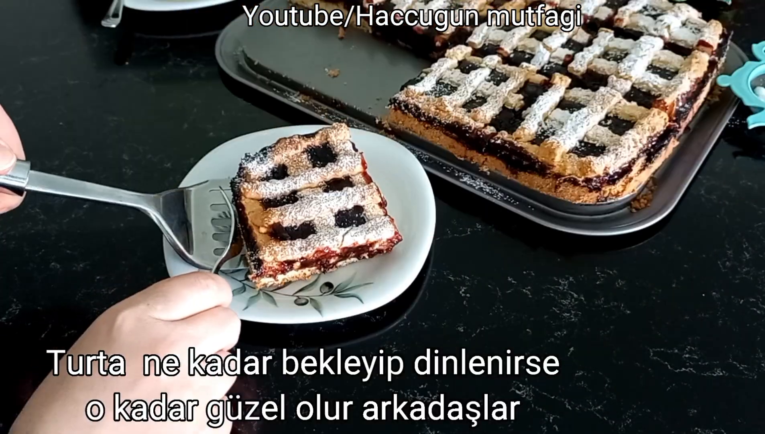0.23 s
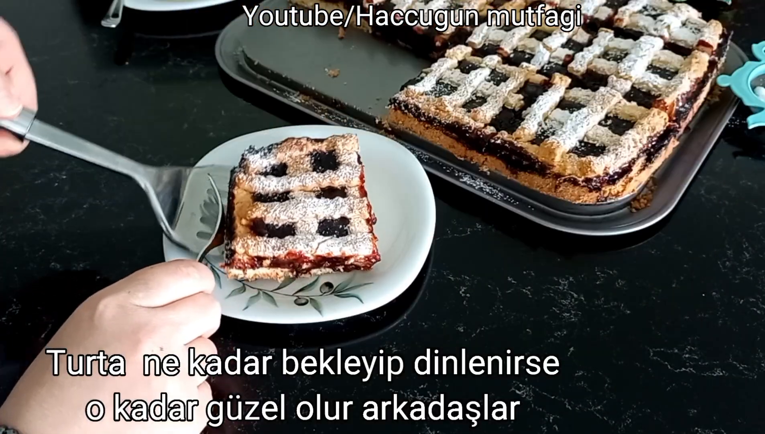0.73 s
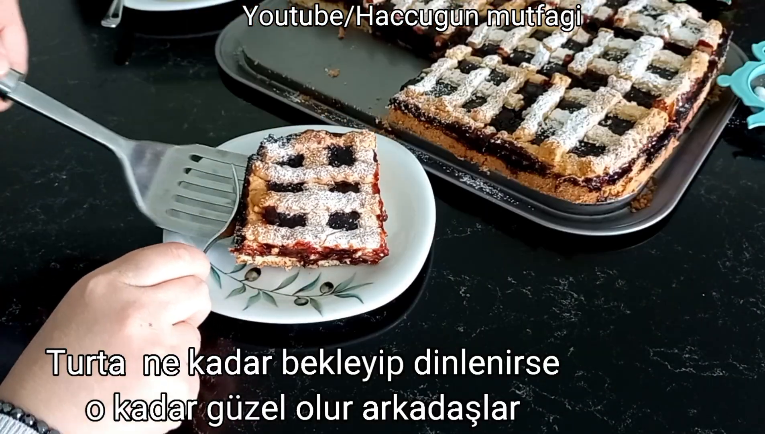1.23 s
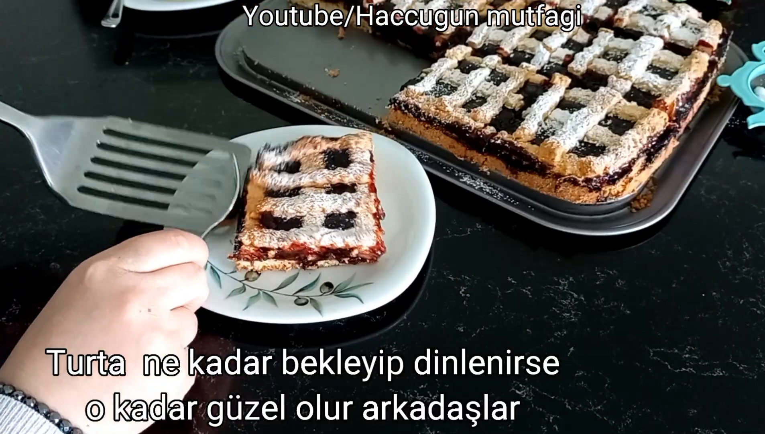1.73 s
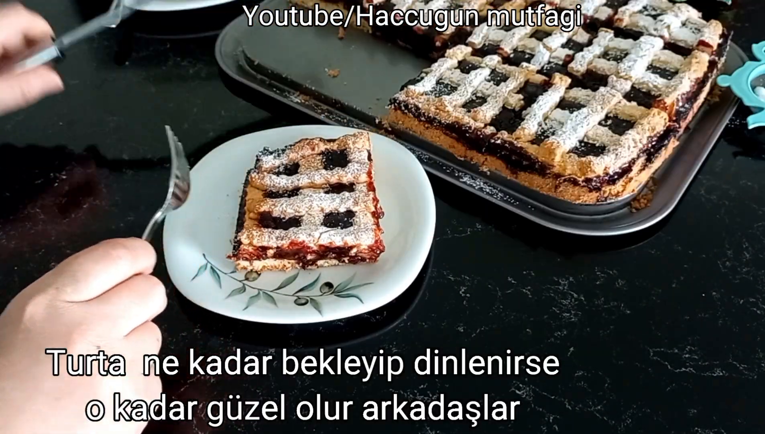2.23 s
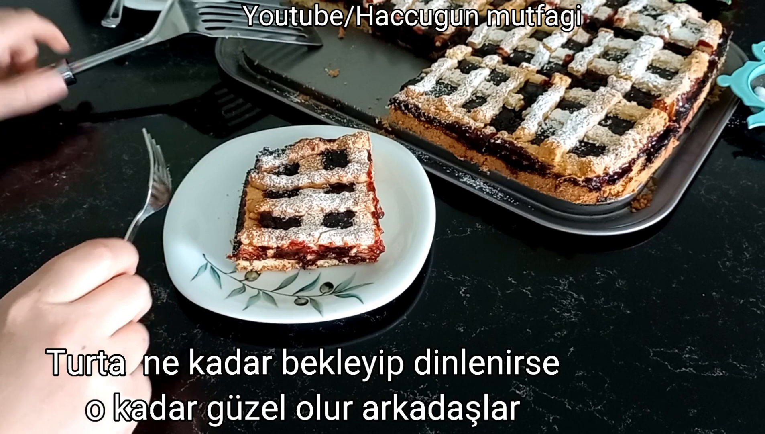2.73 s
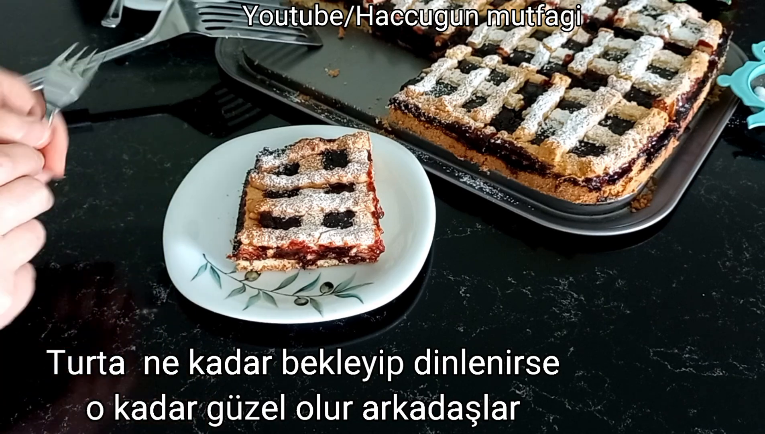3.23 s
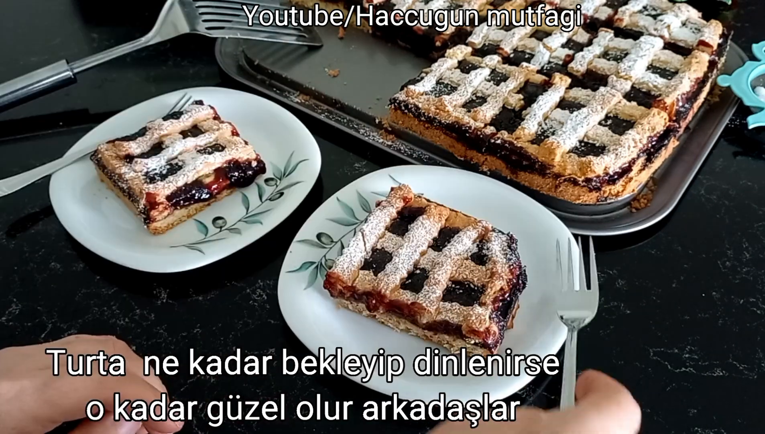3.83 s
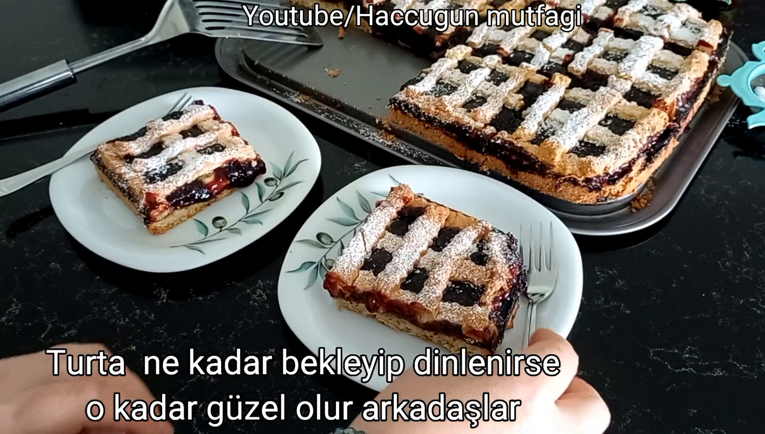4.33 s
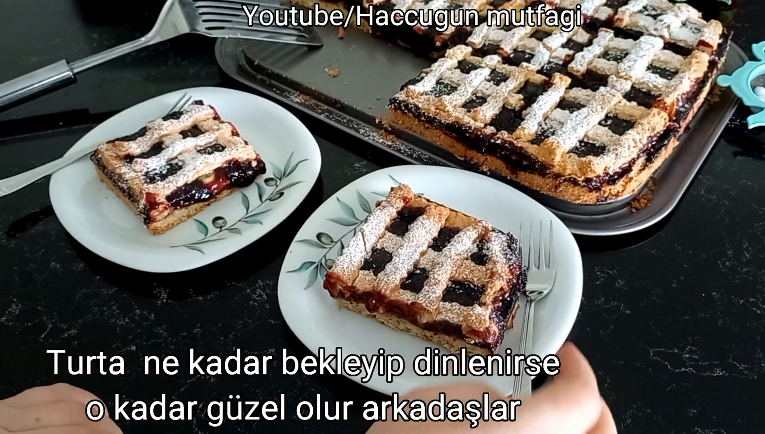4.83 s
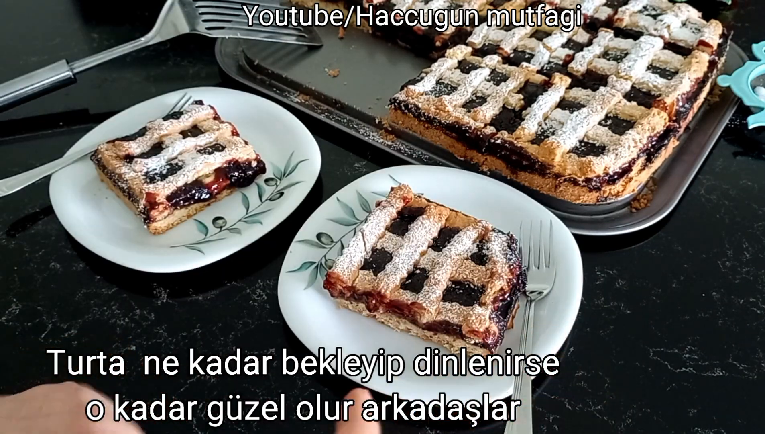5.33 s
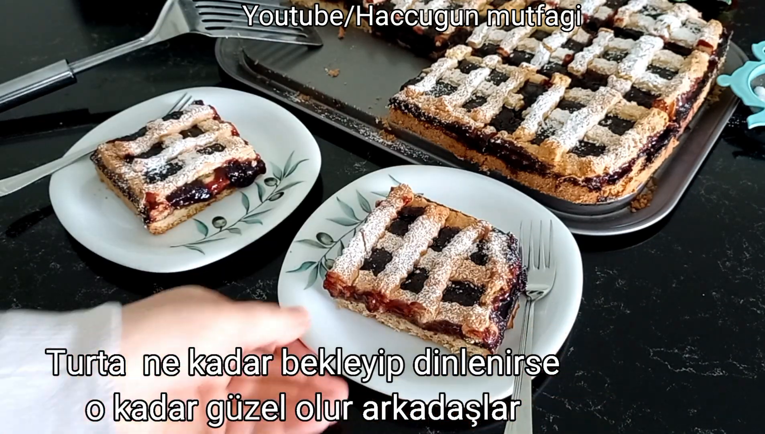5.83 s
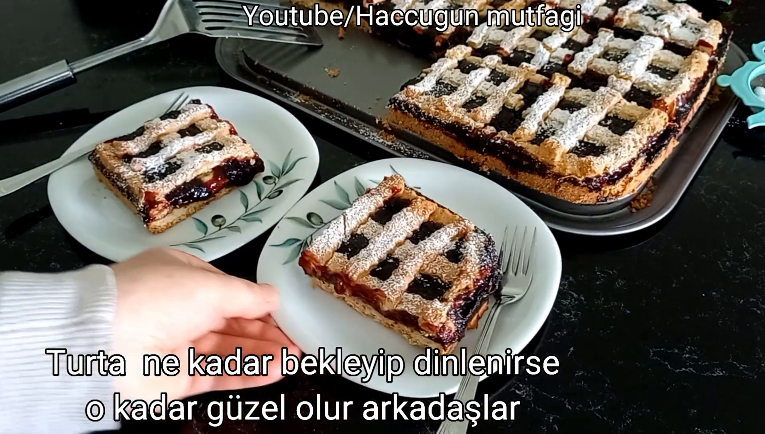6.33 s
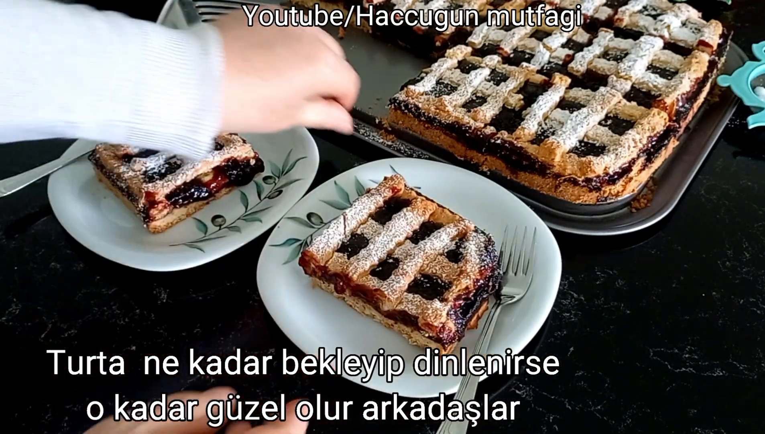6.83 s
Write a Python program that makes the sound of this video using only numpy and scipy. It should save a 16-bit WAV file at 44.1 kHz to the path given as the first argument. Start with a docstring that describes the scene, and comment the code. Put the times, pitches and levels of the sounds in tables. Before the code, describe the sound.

A quiet kitchen, heard close in stereo with a short, diffuse room tail. A dull, nearly mono air rush and very faint hiss run throughout. A far bird gives thin, sometimes hoarse whistles, clearest at about 1.2, 4.3 and 6.6 s. Around 1.4 to 2.1 s a steel spatula makes barely audible high swishes, with a faint double tick on china at 1.88. At 2.54 to 2.6 it settles on the loaded tray, a soft tinny clatter with a slight low thud. At 2.86 water starts suddenly in the centre, a thin trickle of hollow gurgles, pinging drops and uneven spray. A fork clinks loud and bright on china at 4.1, tapping lightly at 4.46. The water stops near 5.63, creeps back from 5.8 and grows splashier. At 6.42 plates knock in a rapid, bright, wide triple contact; the trickle continues to the end, about 7.1 s.

```python
"""A far bird whistles faintly, now and then, over room tone; its calls are frequency-modulated sine tones.
Cake is served at a kitchen counter: a steel spatula swishes (shaped noise), ticks on a plate (decaying modes)
and is laid on the baking tray (noise clatter and a low sine thud). Water then trickles dead centre in two runs
of ringing bubbles, pinging drops and resonant spray. During the first a fork is set down on china; during the
second one plate knocks against another. A decaying diffuse tail answers the china and the tray."""
import sys
import numpy as np
from scipy import signal
from scipy.fft import rfft, irfft, next_fast_len
from scipy.io import wavfile
from scipy.ndimage import map_coordinates

SR = 44100
rng = np.random.default_rng(int(sys.argv[2]) if len(sys.argv) > 2 else 0)


def master_out(mix):
    """Clip the mix to full scale and print it as 16-bit PCM to the path in sys.argv[1]."""
    frames = np.transpose(np.atleast_2d(mix))
    ceiling = np.clip(frames, -1, 1)
    pcm = np.round(ceiling * 32767).astype(np.int16)
    wavfile.write(sys.argv[1], SR, pcm)


N = 312669
TIME = np.arange(N) / SR  # s

# reverberation of the kitchen: f/Hz, t60/s
KITCHEN_DECAY = [(150, 0.58), (1000, 0.47), (2500, 0.43), (6000, 0.37), (10000, 0.38), (15000, 0.34)]
# the two runs of water: start t/s, rise time/s, stop t/s, t60 of the last dribble/s
WATER_RUNS = [(2.86, 0.0031, 5.625, 0.069), (5.79, 0.017, 7.1, .06)]


def amp(db):
    """Decibels to an amplitude ratio: 20 dB is a factor of ten."""
    return 10 ** (np.asarray(db) / 20)


def unit(x):
    """Normalisation to an rms of 1."""
    return x / np.sqrt(np.mean(x ** 2) + 1e-20)


def along(points, hz):
    """Interpolation of (f/Hz, value) points on a logarithmic frequency axis."""
    f, value = np.transpose(points)
    return np.interp(np.log(hz + 1), np.log(f + 1), value)


def curves(rows):
    """Linear interpolation in time: one value per sample for each column after the time."""
    seconds, *columns = np.transpose(rows)
    return [np.interp(TIME, seconds, column) for column in columns]


def wobble(rate):
    """Smooth random modulation: a spline through random knots, rate knots a second."""
    return map_coordinates(rng.standard_normal(8192), [TIME * rate], mode="wrap")


def filtered(x, response):
    """Linear filtering: the spectrum is multiplied by a gain that depends on frequency."""
    n = x.shape[-1]
    padded = next_fast_len(n + 8192)
    spectrum = rfft(x, padded) * response(np.fft.rfftfreq(padded, 1 / SR))
    return irfft(spectrum, padded)[..., :n]


def noise(spectrum, shape):
    """Coloured noise of rms 1: white noise shaped by (f/Hz, level/dB) points."""
    white = rng.standard_normal(shape)
    return unit(filtered(white, lambda hz: amp(along(spectrum, hz))))


def fade(t, t60):
    """Exponential decay by 60 dB in t60."""
    return np.exp(-np.log(1000) * t / t60)


def swell(u):
    """Smooth growth and decay: the envelope grows to 1 at u = 1, then dies away."""
    return u ** 2 * np.exp(2 - 2 * u)


def add(track, s, x):
    """Superposition: mixes x into the track at time s."""
    part = track[..., max(round(s * SR), 0):][..., :x.shape[-1]]
    part += x[..., :part.shape[-1]]


def diffuse(pair):
    """Spatial coherence: two unrelated signals become a stereo field, narrower in the bass."""
    # f/Hz, side level/dB
    side_levels = [(80, -3), (400, -10), (1200, 0.5), (2500, -2.5), (8000, -0.5)]
    mid = pair[0]
    side = filtered(pair[1], lambda hz: amp(along(side_levels, hz)))
    return np.array([mid + side, mid - side]) / np.sqrt(2)


def echo(x, decays):
    """Reverberation: convolution with diffuse noise of unit energy whose bands decay at their own speed."""
    hz, t, z = signal.stft(rng.standard_normal((2, SR)), SR, nperseg=256)
    decaying = z * fade(t, along(decays, hz)[:, None])
    tail = diffuse(signal.istft(decaying, SR, nperseg=256)[1])
    delayed = np.pad(tail, ((0, 0), (130, 0)))  # about 3 ms before the tail begins
    return signal.fftconvolve(np.atleast_2d(x), delayed / np.linalg.norm(tail[0]), axes=1)[:, :N]


def china(crack_db=-7, crack_t60=0.013, shiver=0.44, attack=0.00015):
    """Modal synthesis: each blow rings damped plate modes, blurred by phase drift, with a crack of contact."""
    # blows: t/s, level/dB, brightness/(dB per octave), left minus right/dB, room over the blow/dB,
    # ring colour (0 = struck as by the fork to 1 = struck at the rim)
    blows = [(1.875, -48.5, 2, 7, -8, 0.56), (1.886, -43.5, 0.5, 1, -6.5, 1),
             (4.101, -16, 1.5, 2.5, -9.5, 0), (4.105, -23, 0, 3, 3, 0.61), (4.458, -36, 0, 16.5, -2, 0.26),
             (4.466, -29.5, 1, 6, -3.5, 0.068), (6.4226, -17, -2, 14, 6, 0.96),
             (6.425, -14.5, -0.5, -11, -14, 0.85), (6.431, -19, 3.5, 16.5, -17, 0.84)]
    # plate modes: f/Hz, relative level at ring colour 0/dB, relative level at ring colour 1/dB, t60/s
    plate_modes = [(615, -21, -17, .06), (850, -15, -13, .04), (1200, -18, -14, .06), (1450, -18, -10, .04),
                   (1675, -15, -10, .05), (1875, -11, -8, .05), (2160, -16, -9, .05), (2480, -9, -2, .04),
                   (2570, -3, 0, .05), (2720, -2, -10, .04), (2990, -4, -11, .04), (4110, -4, -1, .04),
                   (4230, -6, -8, .05), (4650, -13, -20, .03), (5965, 1, -11, .04), (7050, -11, -17, .05),
                   (7990, -10, -16, .06), (8500, -15, -26, .05), (9550, -22, -25, .06),
                   (10350, -15, -16, .07), (11600, -21, -20, .05), (12750, -16, -21, .045),
                   (14100, -28, -11, .08), (14800, -18, -28, .06)]
    # contact noise: f/Hz, relative level/dB
    contact_spectrum = [(60, -32), (250, -29), (700, -5), (2500, 0), (3500, 3.5), (5000, -1.5), (8000, 0),
                        (15000, -32.5)]
    # f/Hz, phase between left and right microphone/rad
    mic_phases = [(500, 0), (2500, .3), (4100, 2.7), (7000, 2.7), (11000, 1.5)]
    out, t = np.zeros((2, N)), np.arange(SR // 4) / SR
    hz, fork_db, rim_db, t60 = np.transpose(plate_modes)
    mics = np.multiply.outer([-.5, .5], along(mic_phases, hz))[:, :, None]
    for s, db, bright_db, pan_db, room_db, ring_colour in blows:
        struck_db = fork_db + ring_colour * (rim_db - fork_db)
        tilt_db = bright_db * np.log2(hz / 4000)
        sizes = amp(struck_db + tilt_db + rng.standard_normal(len(hz)))
        steps = rng.standard_normal((len(hz), len(t)))
        drift = shiver * np.cumsum(steps, 1) / np.sqrt(SR / 1000)  # shiver in radians per root ms
        phase = rng.uniform(0, 2 * np.pi, (len(hz), 1)) + drift + mics
        partials = fade(t, t60[:, None]) * np.sin(2 * np.pi * hz[:, None] * t + phase)
        ring = np.sum(sizes[:, None] * partials, 1) / np.linalg.norm(sizes)
        crack_spectrum = [(f, level + bright_db * np.log2(f / 4000)) for f, level in contact_spectrum]
        crack = amp(crack_db) * diffuse(noise(crack_spectrum, (2, len(t)))) * fade(t, crack_t60)
        blow = amp(db) * (ring + crack) / np.sqrt(2) * (1 - np.exp(-t / attack))
        add(out, s, blow * amp([[pan_db / 2], [-pan_db / 2]]))
        add(out, s, amp(room_db) * echo(blow[0], KITCHEN_DECAY))
    return out


def tray(thud_hz=130, thud_t60=0.36, room_db=-8):
    """Damped vibration: the loaded tin tray clatters as decaying noise and thuds as a decaying sine."""
    # landing and settling: t/s, clatter level/dB, clatter t60/s, thud level/dB
    landings = [(2.536, -42, 0.28, -53), (2.549, -42.5, 0.23, -66), (2.577, -50, 0.16, -51.5),
                (2.603, -41.5, 0.058, -65), (2.61, -57, 0.09, -56)]
    # clatter: f/Hz, relative level/dB
    tin_spectrum = [(60, -27), (130, -36), (250, -1.5), (450, -7), (800, -1), (1500, -5.5), (2000, -3),
                    (2600, -3.5), (3300, -8), (4300, -16.5), (6000, -25.5), (9000, -23.5), (15500, -41)]
    out, t = np.zeros((2, N)), np.arange(SR // 2) / SR
    for s, clatter_db, t60, thud_db in landings:
        clatter = diffuse(noise(tin_spectrum, (2, len(t)))) * fade(t, t60)
        thud = np.sin(2 * np.pi * thud_hz * t) * fade(t, thud_t60)
        add(out, s, amp(clatter_db) * clatter)
        add(out, s, amp(thud_db) * thud)
    return out + amp(room_db) * echo(out[0], KITCHEN_DECAY)


def spatula():
    """Friction noise: steel brushes over crumbs with a faint, high swish in bell-shaped strokes."""
    # strokes under the cake: middle t/s, half length to 1/e/s, level/dB
    slides = [(1.434, 0.1, -75), (1.7, 0.3, -84.5), (2.1, 0.18, -78)]
    strokes = sum(amp(db) * np.exp(-((TIME - s) / half) ** 2) for s, half, db in slides)
    return strokes * noise([(2000, -19), (4000, -6.5), (8000, 4), (15000, 2.0)], (2, N))


def water(gurgle_db=0.5, splash_db=-2.0, murmur=1.0, fizz=1.52, spurt_db=2.47, glug_db=2.5):
    """Bubble acoustics: big bubbles gurgle low; fine spray fizzes through the resonances of a hollow."""
    # gurgle: f/Hz, gain/dB
    gurgle_spectrum = [(200, -41), (450, -13), (700, -8), (1000, 0), (1300, 1), (1700, -8.5), (2000, -3),
                       (2500, -15), (3300, -13.5)]
    # hollow resonances: f/Hz before tuning, width/Hz before the factor 0.56 below and tuning, level/dB
    resonances = [(2380, 2600, -9.5), (3180, 140, 6), (3680, 620, 1), (5200, 830, -2), (7175, 990, 1.5),
                  (9020, 1040, -14.5), (10200, 810, -19)]
    low = swarm(count=1800, low_hz=448.4, high_hz=2702, cycles=4.8, spread_db=3.5, size=1600)
    low = low + murmur * noise([(300, 2), (3000, -0.5), (4000, -25)], N)
    shaped = filtered(low, lambda hz: amp(along(gurgle_spectrum, hz)))
    gurgle = unit(shaped * amp(glug_db * wobble(55)))

    spray = swarm(count=11000, low_hz=1993, high_hz=8230, cycles=3.5, spread_db=1.5, size=500)
    spray = spray + fizz * rng.standard_normal(N)
    hz, t, z = signal.stft(spray, SR, nperseg=512)
    tuned_hz = hz[:, None] / tuning(t)
    hollow = sum(amp(db) / (1 + ((tuned_hz - centre) / (0.56 * width)) ** 2) ** 1.28
                 for centre, width, db in resonances)
    splash = unit(signal.istft(z * hollow, SR, nperseg=512)[1][:N])
    spurts = (wobble(22) + wobble(60) + wobble(190)) / np.sqrt(3)  # spray comes in spurts
    splash = splash * amp(spurt_db * spurts)

    gurgling, splashing = flow()
    stream = amp(gurgle_db) * gurgling * gurgle + amp(splash_db) * splashing * splash
    return stream + plops(gurgling) + drops(splashing, splash)


def bubble(t, hz, swell_s, glide):
    """Resonance of a pocket of air: it swells into ringing and dies while its pitch slides."""
    u = t / swell_s
    cycles = hz * swell_s * (u + glide * (u - 1) ** 2 / 2)  # the pitch is hz at the peak, u = 1
    return swell(u) * np.sin(2 * np.pi * cycles)


def swarm(count, low_hz, high_hz, cycles, spread_db, size):
    """Superposition of many bubbles of random moment, pitch, life and strength; rms 1."""
    start, pitch, life, strength, slide = rng.random((count, 5)).T[:, :, None]
    hz = low_hz * (high_hz / low_hz) ** pitch
    swell_s = cycles * 2 ** (2 * life - 1) / hz
    waves = bubble(np.arange(size) / SR, hz, swell_s, 0.23 * (slide - .5))
    waves = waves * amp(spread_db * np.minimum(-np.log(strength), 3.5)) * (hz / low_hz)
    places = (start * N).astype(int) + np.arange(size)
    return unit(np.bincount(places.ravel(), waves.ravel(), N)[:N])


def flow():
    """Amplitude envelopes of gurgle and splash: each run starts, follows the stream and stops."""
    # for each run: t/s, gurgle level/dB, splash level/dB, both before the trims in water()
    stream_levels = [
        [(2.86, -51, -56.5), (3.2, -51, -55), (3.45, -51.5, -57), (3.8, -52.5, -52), (4.15, -53.5, -56.5),
         (4.6, -53.5, -59), (5.2, -53, -56), (5.55, -53.5, -57), (5.63, -75, -62.5)],
        [(5.8, -81, -82), (5.93, -59.5, -64.5), (6.08, -54, -58.5), (6.5, -50.5, -52), (6.7, -53, -56),
         (6.87, -49, -52.5), (7.05, -53.5, -58.5)],
    ]
    total = 0
    for levels, (start, rise, stop, fall) in zip(stream_levels, WATER_RUNS):
        onset = np.clip((TIME - start) / rise, 0, 1)
        dribble = fade(np.maximum(TIME - stop, 0), fall)
        total = total + amp(curves(levels)) * onset * dribble
    return total


def tuning(t):
    """Resonance shift: the frequency ratio of the hollow sinks steadily through each run."""
    start_ratios, sag_per_s = (0.972, 0.93), 0.018
    run = (t > WATER_RUNS[1][0]).astype(int)
    return np.take(start_ratios, run) - sag_per_s * (t - np.array(WATER_RUNS)[run, 0])


def lesser(strength, hz, octaves, db, scatter_db, count):
    """Jittered event process: random events whose level follows the flow; rows (t/s, level/dB, f/Hz)."""
    when, pitch, size = rng.random((count, 3)).T
    s = (np.arange(count) + when) / count * N / SR
    flow_db = 20 * np.log10(np.interp(s, TIME, strength) + 1e-9)
    levels = flow_db + db + scatter_db * (4 * size - 2)
    pitches = hz * 2 ** (octaves * (4 * pitch - 2))
    return [row for row in zip(s, levels, pitches) if row[1] > -80]  # the faintest are left out


def plops(strength):
    """Bubble resonance: single bubbles ring out of the gurgle, the lesser ones creeping up in pitch."""
    # placed bubbles: t/s, peak level/dB, f/Hz, swell time/s, pitch change per swell time as a share
    placed_bubbles = [(2.862, -45, 1210, 0.0076, 0.089), (2.927, -41, 1013, 0.0088, 0.03),
                      (2.975, -39.5, 1240, 0.0068, -0.016), (3.005, -52, 565, 0.017, 0.13),
                      (3.063, -42.5, 1240, 0.011, .06), (3.123, -34.5, 1280, 0.0023, -0.098),
                      (3.125, -41, 1147, 0.016, 0.056), (3.266, -37, 1170, 0.0034, -.09),
                      (3.326, -42, 1310, 0.0064, -.02), (3.382, -50, 590, 0.012, 0.089),
                      (3.475, -42.5, 1200, 0.021, .08), (3.643, -39, 1330, 0.0045, 0.034),
                      (3.669, -39, 1490, 0.0054, -.06), (3.926, -36, 1980, .002, 0.009),
                      (3.948, -38.5, 1510, .0025, .04), (4.02, -40.5, 977, .005, 0.0076),
                      (4.433, -41.5, 1390, 0.0038, 0.022), (4.514, -48.5, 693, 0.0099, 0.15),
                      (4.613, -45.5, 1310, 0.016, -0.049), (4.666, -44, 1950, .003, 0.019),
                      (4.793, -49.5, 790, 0.021, 0.18), (4.84, -43.5, 1343, 0.018, 0),
                      (5.04, -40, 1110, 0.0087, -.075), (5.193, -41.5, 1880, 0.0029, -0.12),
                      (5.383, -41, 920, 0.0081, 0.019), (5.505, -46, 744, 0.011, -0.014),
                      (5.526, -36.5, 1330, 0.0029, -0.16), (6.134, -46, 742, 0.0077, -0.029),
                      (6.186, -44, 906, 0.0058, .13), (6.357, -36, 1317, 0.0093, -0.055),
                      (6.6, -36, 1340, 0.0054, -0.05), (6.633, -33, 2030, 0.0021, -0.062),
                      (6.812, -36.5, 1044, 0.0042, -0.034), (6.896, -36.5, 1347, .0045, 0.02),
                      (6.945, -36.5, 1950, 0.0029, -.02), (6.969, -37.5, 983, 0.0052, 0.22),
                      (7.071, -37, 1140, 0.0025, -.06)]
    # lesser bubbles: f/Hz at the start of the first run, spread/octave, swell time/s,
    # level over the gurgle/dB, scatter/dB; draws lie within two spreads or scatters either way
    lesser_bubbles = (1200, 0.0924, 0.0166, 1.6, 2.7)
    fill_octaves_per_s = 0.0447
    out = np.zeros(N)
    centre_hz, octaves, swell_s, over_db, scatter_db = lesser_bubbles
    glides = 0.041 * rng.standard_normal(130)  # share of the pitch per swell time, up or down
    rows = lesser(strength, centre_hz, octaves, over_db, scatter_db, count=len(glides))
    small = []
    for (s, db, hz), glide in zip(rows, glides):
        risen_hz = hz * 2 ** (fill_octaves_per_s * (s - WATER_RUNS[0][0]))
        small.append((s, db, risen_hz, swell_s, glide))
    for s, db, hz, life, glide in list(placed_bubbles) + small:
        t = np.arange(int(6 * life * SR)) / SR
        add(out, s, amp(db) * bubble(t, hz, life, glide))
    return out


def drops(strength, splash, spray_s=0.0023):
    """Bubble entrainment: each drop traps a tiny pinging bubble and throws a brief burst of spray."""
    # placed drops: t/s, reference level/dB, ping f/Hz, ping over reference/dB, spray over reference/dB
    placed_drops = [(2.8933, -39.5, 3630, 2, -26), (3.0051, -39.5, 3300, -7, -12),
                    (3.1462, -39, 3850, -5, -15), (3.168, -38.5, 3300, -8, -10),
                    (3.1793, -41, 3100, -1, -21), (3.253, -38.5, 4900, -2.5, -16),
                    (3.292, -34.5, 3780, -0.5, -24), (3.692, -37, 3430, 1.5, -16),
                    (3.7597, -38.5, 3480, 0.5, -32), (4.0372, -41, 2700, 1, -32),
                    (4.2426, -35, 2800, -1, -22), (4.7844, -44, 4950, -3, -9),
                    (5.3587, -33, 2940, -14, -11.5), (6.0854, -43, 2860, -3, -6),
                    (6.129, -31.5, 3350, 0.5, -17.5), (6.2902, -30.5, 7200, -6.5, -13),
                    (6.585, -29.5, 2740, -5, -13), (6.6806, -33, 2820, -18, -7.5),
                    (6.761, -50, 2960, -19, -4), (6.826, -39, 4930, -3, -10), (6.852, -34.5, 4600, -4, -21),
                    (6.886, -35.5, 4700, -5, -17)]
    # lesser drops: ping f/Hz, spread/octave, level over the splash/dB, scatter/dB;
    # draws lie within two spreads or scatters either way
    lesser_drops = (3400, 0.275, 4.6, 3.7)
    lesser_ping_db, lesser_spray_db = -1, -15  # over the level of the drop
    ping_s, ping_glide = 0.0015, -0.037  # swell time; share by which the pitch sags per swell time
    pings, spray, t = np.zeros(N), np.zeros(N), np.arange(SR // 20) / SR
    rows = lesser(strength, *lesser_drops, count=260)
    small = [(*row, lesser_ping_db, lesser_spray_db) for row in rows]
    for s, db, hz, ping_db, spray_db in list(placed_drops) + small:
        add(pings, s, amp(db + ping_db) * bubble(t, hz, ping_s, ping_glide))
        # the spray peaks together with the ping
        add(spray, s + ping_s - spray_s, amp(db + spray_db) * swell(t / spray_s))
    return pings + spray * splash


def bird(rasp=0.13, waver_db=1.0, overtone_db=-7, echo_db=-12, echo_t60=1.43):
    """Frequency modulation: thin whistles turn in pitch, flutter makes them hoarse, the hoarsest gain an octave."""
    # start t/s, length/s, turning f/Hz, level/dB, growth of the level over the call/dB,
    # turn as a share of the length, depth below the turning pitch at start and end as shares of it
    # (negative = above), roughness 0-1, depth of the pulsing/dB (negative = pulse inverted)
    calls = [(.09, .2, 4530, -85.5, -10, 0.26, 0, 0.02, .15, 4),
             (.32, 0.14, 2045, -66, 7, 0.33, .04, 0.14, 0.6, -2.5),
             (.405, 0.046, 2540, -71.5, 25, 0.25, 0, .1, 0.71, -4),
             (0.519, 0.33, 3420, -76.5, -13, 1, 0.47, 0, 0.68, 2),
             (.78, 0.44, 2775, -80, -6, 0.88, -0.16, 0.051, .85, 2),
             (1.222, .176, 2135, -52, 11.5, 0.49, .035, 0.132, 0.17, 3.5),
             (2.079, 0.35, 1460, -76, 4, 0.88, .04, 0, 0.069, 0),
             (3.508, 0.13, 2430, -63, 3, 0.42, .09, .17, 0.36, 10),
             (3.82, 0.16, 2020, -56.5, -6.5, 0.091, 0, 0.017, .2, 0.5),
             (4.305, 0.057, 2177, -45, 3, 0.34, .02, 0.18, 0.19, -2.5),
             (6.595, .23, 2925, -47, 6, .5, -.035, -0.06, .08, -0.5)]
    attack, release = 0.088, 0.13  # shares of the length
    drop_power = 3.54  # how late and steep the drop comes
    pulse_hz, pulse_lead_s = 25.9, 0.0012  # rate; time of the first pulse in a call
    song, flutter, waver = np.zeros(N), wobble(1400), wobble(60)
    for s, length, turn_hz, db, growth_db, turn, rise, drop, rough, pulse_db in calls:
        t = np.arange(int(length * SR)) / SR
        u, turn = t / length, np.clip(turn, .05, .95)
        now = slice(round(s * SR), round(s * SR) + len(t))
        before = np.maximum(1 - u / turn, 0)
        after = np.maximum((u - turn) / (1 - turn), 0)
        hz = turn_hz * (1 - rise * before ** 2 - drop * after ** drop_power)
        phase = 2 * np.pi * np.cumsum(hz * (1 + rasp * rough * flutter[now])) / SR
        envelope = np.minimum(u / attack, 1) * np.minimum((1 - u) / release, 1)
        pulsing_db = pulse_db * np.cos(2 * np.pi * pulse_hz * (t - pulse_lead_s))
        level_db = db + growth_db * (u - .5) + pulsing_db + waver_db * waver[now]
        overtone = amp(overtone_db) * max(2 * rough - 1, 0) * np.sin(2 * phase)
        add(song, s, envelope * amp(level_db) * np.sqrt(2) * (np.sin(phase) + overtone))
    return song + amp(echo_db) * echo(song, [(2000, echo_t60), (3000, 0.24)])[0]


def room_tone(air_db=-62.5, side_db=-17, hiss_db=-80.0, edge_hz=2200):
    """Stationary background noise: a dull, nearly mono rush under a faint wide hiss."""
    # rush: f/Hz, relative level/dB
    air_spectrum = [(20, -36.5), (40, -22), (62, -4.5), (110, -2.5), (170, -5.5), (280, -3.5), (420, -2.5),
                    (650, -6.5), (1200, -11.5), (2000, -15), (3000, -25)]
    # hiss: f/Hz, relative level/dB
    hiss_spectrum = [(1500, -10), (2200, 6), (2700, 4), (4000, 0), (8000, -1), (15500, -1)]
    rush = noise(air_spectrum, (2, N))
    mid, side = filtered(rush, lambda hz: 1 / np.sqrt(1 + (hz / edge_hz) ** 18))
    air = unit(mid + amp(side_db) * np.array([side, -side]))
    return amp(air_db) * air + amp(hiss_db) * noise(hiss_spectrum, (2, N))


def scene():
    """Superposition of all the sources."""
    return china() + tray() + spatula() + water() + bird() + room_tone()


def record(dry, low_cut_hz=50, top_hz=15500):
    """Band limitation: the small microphone drops the deep bass, and a steep edge ends the treble."""
    voiced = filtered(dry, lambda hz: (hz / low_cut_hz) ** 2 / np.sqrt(1 + (hz / low_cut_hz) ** 4))
    return filtered(voiced, lambda hz: 1 / np.sqrt(1 + (hz / top_hz) ** 120))


dry = scene()
out = record(dry)
master_out(out)
```